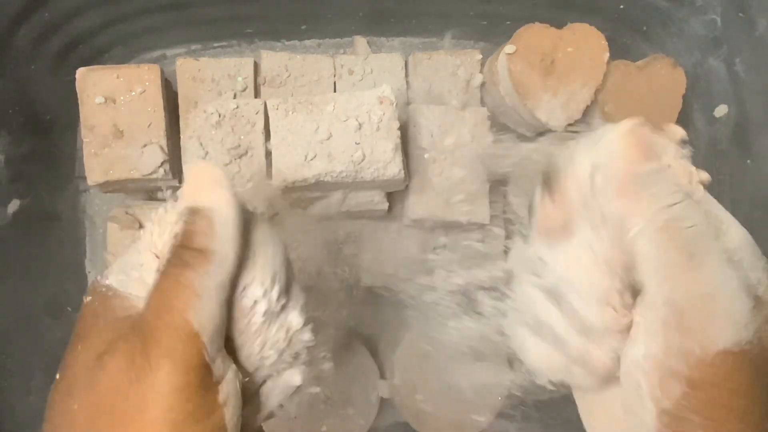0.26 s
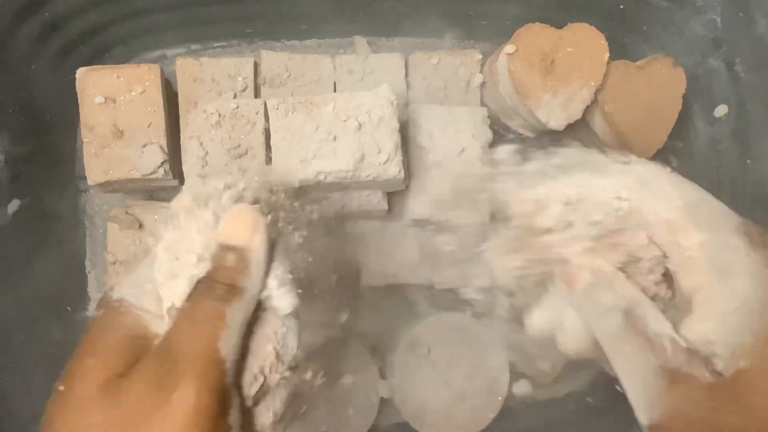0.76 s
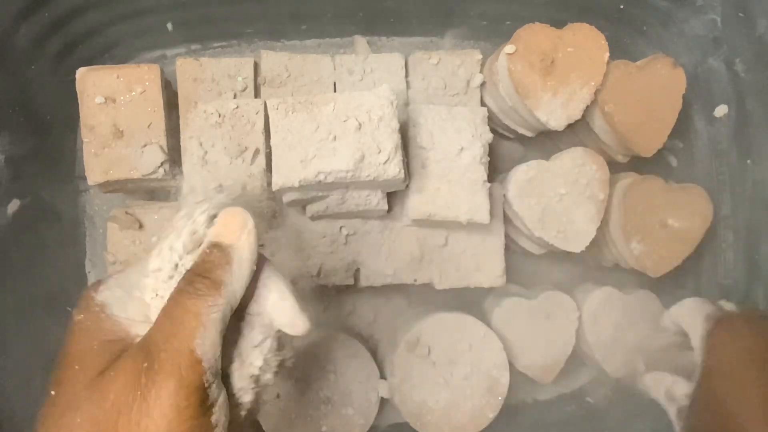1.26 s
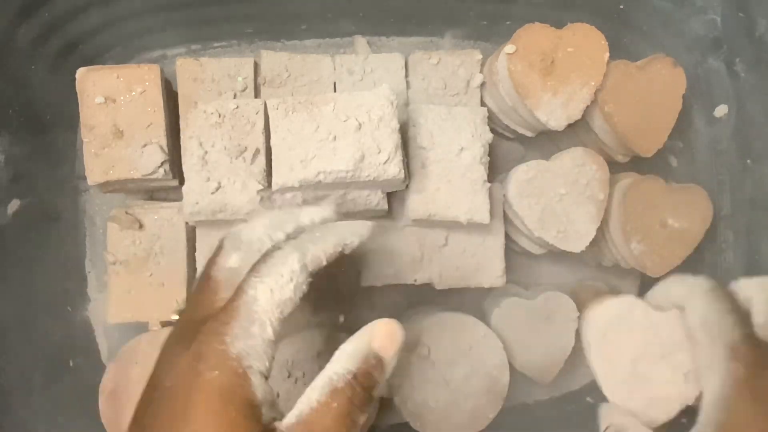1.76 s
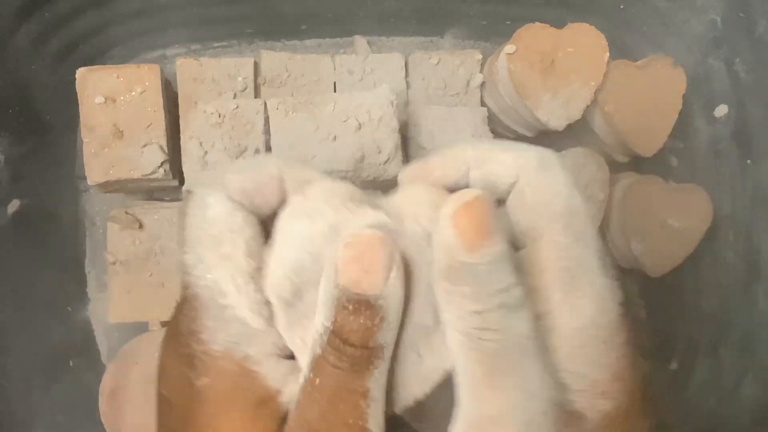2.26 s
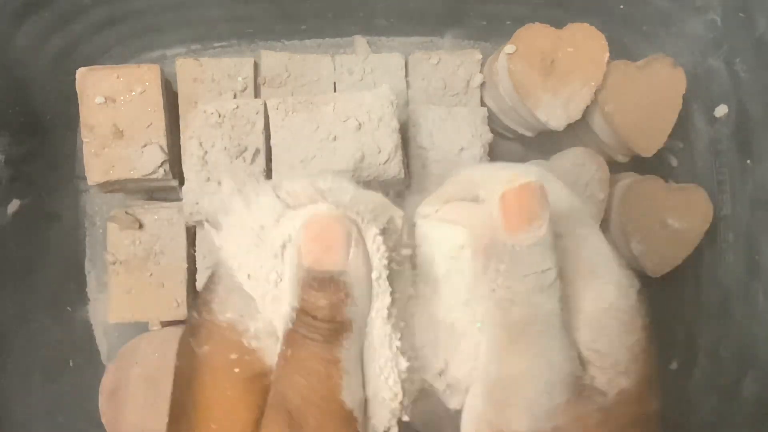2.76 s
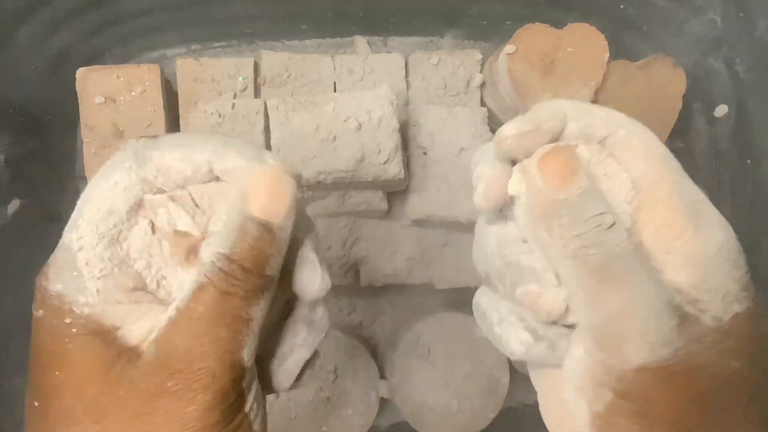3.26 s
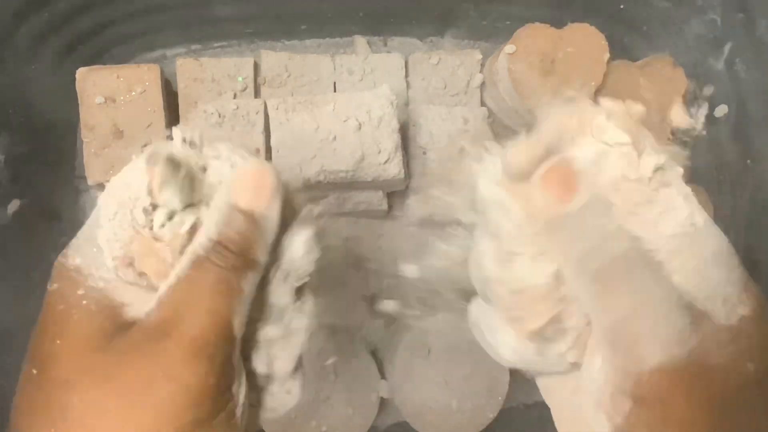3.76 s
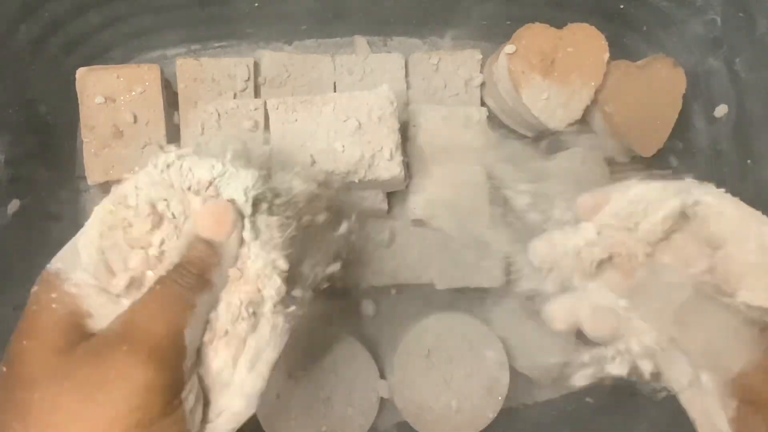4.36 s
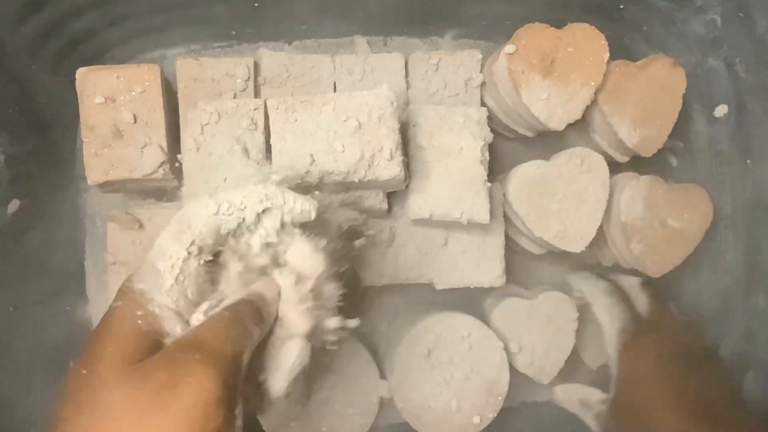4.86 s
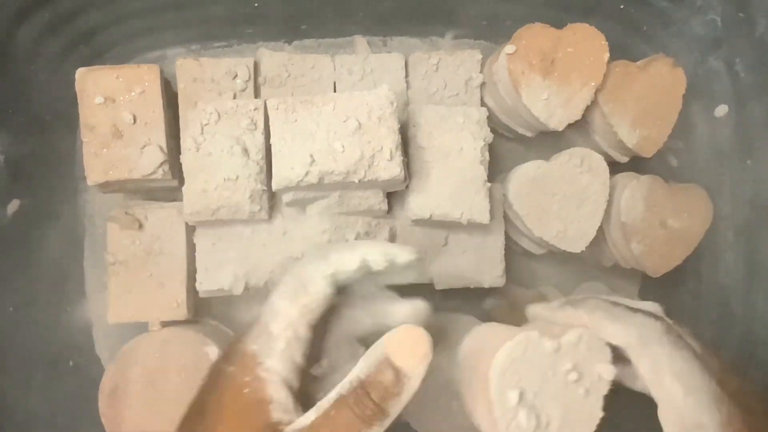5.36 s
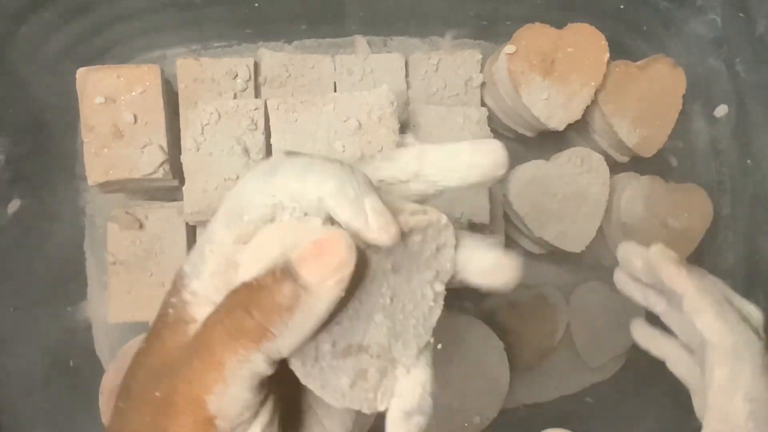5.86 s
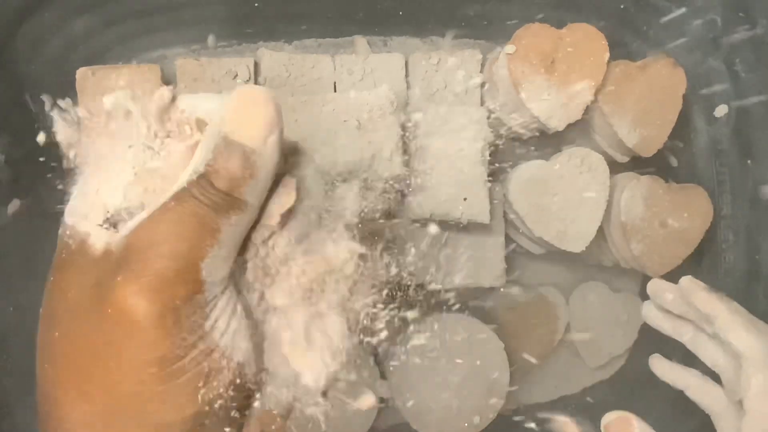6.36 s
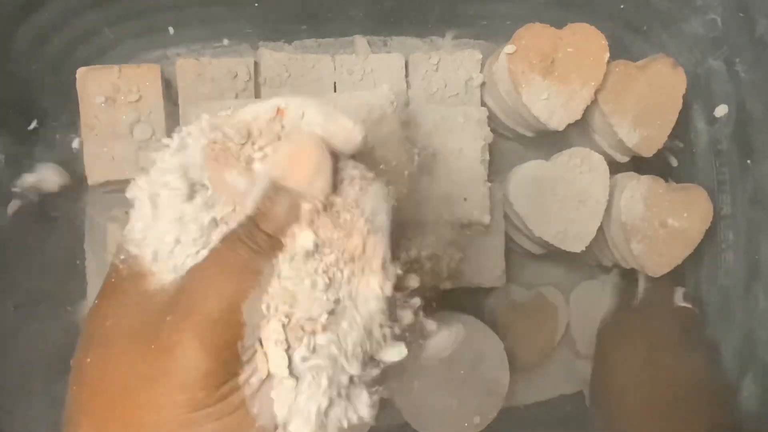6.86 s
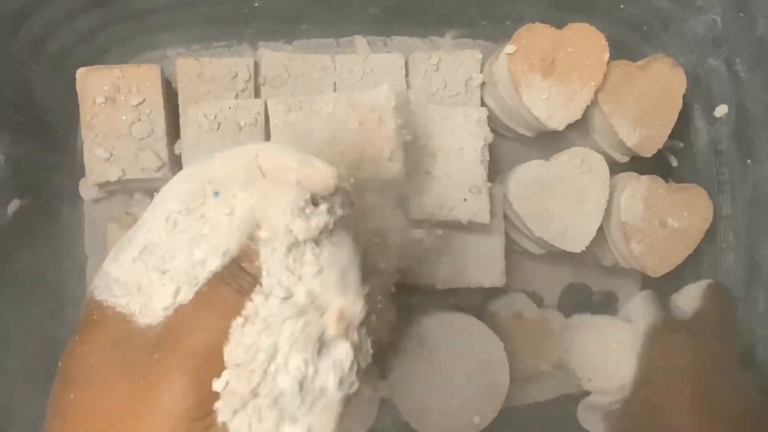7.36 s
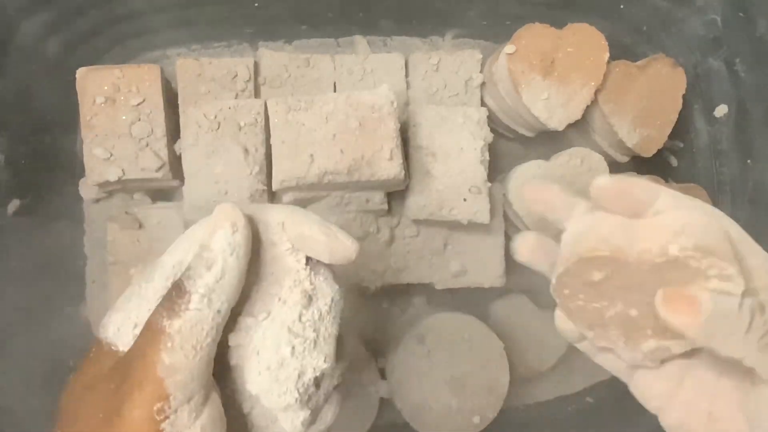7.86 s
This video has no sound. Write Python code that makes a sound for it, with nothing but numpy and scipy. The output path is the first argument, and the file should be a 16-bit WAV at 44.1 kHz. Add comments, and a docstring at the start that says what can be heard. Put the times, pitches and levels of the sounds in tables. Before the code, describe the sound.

Close bursts of chalk being crushed by hand, snapping and crumbling as powder sifts and lumps drop into a tub.

```python
"""Blocks of dry chalk crushed in two hands over a plastic tub, close to a stereo pair of microphones.
Blocks crack, snap and tick, pieces cave in inside the fist, and powder squeaks and hisses
between the fingers. Crumbs patter down, loose powder pours, and larger lumps thud onto the blocks
below and ring the tub. The place is a small, quiet room with a short echo."""
import sys
import numpy as np
from scipy import signal
from scipy.fft import rfft, irfft, next_fast_len
from scipy.io import wavfile
from scipy.ndimage import uniform_filter1d, map_coordinates

SR = 44100
rng = np.random.default_rng(int(sys.argv[2]) if len(sys.argv) > 2 else 0)


def unload_wav(signal):
    """Save mono or channel-first audio to the path in sys.argv[1] as 16-bit WAV at rate SR, clipped to [-1, 1]."""
    wavfile.write(
        sys.argv[1],
        SR,
        np.round(np.clip(np.atleast_2d(signal).T, -1, 1) * 32767).astype(np.int16),
    )


N = 358091

# modes of the loaded tub: (frequency [Hz], width [Hz], gain [dB])
TUB_MODES = [(93.2, 23, 6), (166, 21.4, 7), (202.6, 8.4, 4), (325, 20.6, 2), (405, 8.3, -16),
             (686.6, 18, -2)]
# spectrum of shearing powder: (frequency [Hz], gain [dB])
POWDER_SPECTRUM = [(1500, -10.5), (2900, 3), (4700, 2.5), (6200, 3.5), (7400, 7.5), (9300, 1), (12500, 5),
                   (15500, 2), (16300, -41)]
# spectrum of the bright tick of hard chalk: (frequency [Hz], gain [dB])
TICK_SPECTRUM = [(1500, -35), (4000, -0.5), (7000, 2.5), (16000, -5)]
# fingers slide over a whole block: (start [s], length [s], level [dB], lowest free mode [Hz])
FINGER_STROKES = [(2.011, 0.044, -38.5, 2410), (2.131, 0.1, -47.5, 2340), (2.253, 0.06, -40, 2400),
                  (2.82, 0.03, -38.5, 4600), (2.859, 0.135, -37.5, 5940), (2.993, 0.038, -34.5, 6300),
                  (3.115, 0.05, -39, 6600), (5.342, 0.083, -54, 3450), (5.509, 0.041, -41, 2880),
                  (5.715, 0.073, -44.5, 2380), (5.815, 0.22, -53, 2900), (7.771, 0.3, -46.5, 2940),
                  (8.02, 0.081, -38.5, 7360)]


def amp(db):
    """Decibels to gain."""
    return 10 ** (np.asarray(db) / 20)


def unit(x):
    """x at rms 1."""
    return x / np.sqrt(np.mean(x ** 2) + 1e-20)


def levelled(x, db, span_s):
    """x scaled so that its first span_s seconds have the given rms level."""
    return x * amp(db) / np.sqrt(np.mean(x[:int(span_s * SR)] ** 2))


def add(track, start_s, sound):
    """Mix a sound into the track."""
    part = track[max(round(start_s * SR), 0):][:len(sound)]
    part += sound[:len(part)]


def along(points, hz):
    """(Hz, value) points read on a log axis."""
    knots, values = np.transpose(points)
    return np.interp(np.log(hz + 1), np.log(knots), values)


def hump(hz, centre_hz, octaves):
    """A bell on the log-frequency axis."""
    return np.exp(-.5 * (np.log2((hz + 1) / centre_hz) / octaves) ** 2)


def filtered(x, response):
    """x times a complex response of frequency."""
    n = x.shape[-1]
    size = next_fast_len(n + SR // 2, real=True)
    return irfft(rfft(x, size) * response(np.fft.rfftfreq(size, 1 / SR)), size)[..., :n]


def coloured(x, colour, size=8192):
    """x through a minimum-phase filter whose gain in dB is colour(Hz)."""
    cepstrum = irfft(np.log(amp(colour(np.fft.rfftfreq(size, 1 / SR)))))
    cepstrum[1:size // 2] *= 2
    cepstrum[size // 2 + 1:] = 0
    return signal.oaconvolve(x, irfft(np.exp(rfft(cepstrum))))[:len(x)]


def modes(x, table):
    """The ring of a body with these resonances when x drives it."""
    return filtered(x, lambda hz: sum(
        amp(db) * 1j * hz * width / (centre ** 2 - hz ** 2 + 1j * hz * width)
        for centre, width, db in table))


def wobble(rate):
    """A smooth random curve, rate knots a second."""
    knots = rng.standard_normal(int(N * rate / SR) + 4)
    return map_coordinates(knots, [np.arange(N) * rate / SR])


def grains(rate, spread_db):
    """Random tiny impulses of widely differing size, rate a second."""
    present = rng.random(N) < rate / SR
    size_db = spread_db * np.clip(rng.standard_normal(N), -2, 2)
    return unit(present * np.sign(rng.standard_normal(N)) * amp(size_db))


def surges(rate, t60, spread_db):
    """Envelope of small collapses, rate a second: each starts at once and dies away."""
    fade = amp(-60 * np.arange(SR // 8) / SR / t60)
    power = signal.fftconvolve(grains(rate, spread_db) ** 2, fade ** 2)[:N]
    return unit(np.sqrt(np.abs(power)))


def burst(t, t60, tail_db, tail_t60):
    """A sudden spray of micro-fractures with a weaker, longer trickle."""
    return rng.standard_normal(len(t)) * (amp(-60 * t / t60) + amp(tail_db - 60 * t / tail_t60))


def patchy(x, depth_db):
    """Shifting gaps between the fingers favour now one band, now another."""
    bands = signal.stft(x, nperseg=256)[2]
    gaps = uniform_filter1d(rng.standard_normal(bands.shape), size=4, axis=0)
    gaps = uniform_filter1d(gaps, size=6, axis=1)
    return unit(signal.istft(bands * amp(depth_db * unit(gaps)), nperseg=256)[1][:N])


def lingering(power, t60):
    """Loose grains spread a burst of activity over time: it trickles out."""
    arrivals = amp(-60 * np.arange(SR) / SR / t60) ** 2
    return np.abs(signal.fftconvolve(power, arrivals / arrivals.sum())[:N])


def held(length, attack_s, release_t60, sag_db_per_s=3):
    """Envelope of a hand movement: it builds up, eases as the chalk gives and dies away."""
    t = np.arange(int((length + release_t60) * SR)) / SR
    release_db = -60 * np.maximum(t - length, 0) / release_t60
    return np.minimum(t / attack_s, 1) * amp(release_db - sag_db_per_s * t)


def stroke(length):
    """Envelope of a finger stroke: an arch, and the grains that keep rolling after it."""
    arch = np.abs(np.sin(np.linspace(0, np.pi, int(length * SR)))) ** 0.76
    return np.sqrt(lingering(arch ** 2, t60=0.32))[:SR // 2]


def room_tone():
    """The faint, low hush of the room."""
    # spectrum of the hush: (frequency [Hz], gain [dB])
    spectrum = [(30, 11.5), (90, 33), (1500, 9.5), (5000, -13)]
    return amp(-59) * unit(coloured(rng.standard_normal(N), lambda hz: along(spectrum, hz)))


def room_echo(x):
    """The near walls return a diffuse tail to each microphone; the treble dies first."""
    # decay of the room: (frequency [Hz], t60 [s])
    decay = [(150, 0.16), (10000, 0.08)]
    hz, t, bands = signal.stft(rng.standard_normal((2, SR // 2)), SR, nperseg=256)
    tail = signal.istft(bands * amp(-60 * t / along(decay, hz)[:, None]), SR, nperseg=256)[1]
    return signal.fftconvolve(x[None], tail / np.linalg.norm(tail[0]), axes=1)[:, :N]


def microphones(x):
    """The close pair differs in phase and level through the middle range and agrees at both ends."""
    # phase across the pair: (frequency [Hz], left lead [rad])
    lead = [(0, 0), (430, -1.0), (860, -3.1), (1380, -3.4), (2330, -4.4), (3100, -8.2), (3960, -10.6),
            (4900, -12.6)]
    # balance of the pair: (frequency [Hz], left minus right [dB])
    balance = [(100, -1), (330, -3.5), (620, -7), (1100, 2), (1900, -4), (2900, -12), (5400, -3.5),
               (7200, -8), (12500, 0)]

    def response(hz):
        turn = np.exp(.5j * np.interp(hz, *np.transpose(lead)))
        ratio = amp(along(balance, hz))
        return np.array([ratio * turn, 1 / turn]) * np.sqrt(2 / (1 + ratio ** 2))
    return filtered(x, response)


def pours():
    """Loose powder drops from an opening hand as a soft mass and sets the tub's low modes rumbling."""
    # a hand opens: (start [s], length [s], level [dB])
    openings = [(1.318, 0.31, -44), (4.995, 0.25, -48.5), (6.868, 0.1, -41), (7.173, 0.64, -47.5)]
    # spectrum of powder landing softly: (frequency [Hz], gain [dB])
    spectrum = [(40, -37), (85, -5.5), (300, -12), (900, -46)]
    flow = np.zeros(N)
    for start, length, db in openings:
        add(flow, start, (amp(db) * held(length, attack_s=0.013, release_t60=0.64)) ** 2)
    landings = coloured(grains(rate=590, spread_db=-3.5), lambda hz: along(spectrum, hz))
    return np.sqrt(flow) * unit(landings + 0.5 * modes(landings, TUB_MODES))


def thuds():
    """A lump strikes with a short knock that sags in pitch as it crushes; the tub rings with it."""
    # lumps give way or land: (time [s], level before trim [dB], nominal pitch [Hz])
    lumps = [(0.047, -45.5, 232), (0.623, -36.5, 260), (0.857, -32.5, 422), (1.036, -39.5, 482),
             (1.848, -50, 245), (2.68, -31.5, 280), (3.27, -49, 217), (3.324, -42.5, 240),
             (3.69, -24.5, 481), (4.239, -26, 287), (4.252, -26, 350), (4.295, -16, 585),
             (5.787, -42.5, 627), (6.543, -39.5, 221), (6.65, -35, 510), (6.736, -28, 288),
             (6.857, -17, 449), (6.882, -26.5, 208), (6.886, -25, 112), (6.929, -22.5, 555),
             (6.952, -29, 407), (7.099, -27.5, 215), (7.208, -36, 370), (7.344, -29.5, 390),
             (7.372, -28, 310)]
    knock_t60, attack_s, trim_db = 0.04, 0.0012, -1.5
    out, t = np.zeros(N), np.arange(SR // 4) / SR
    sag = 0.736 + 0.678 * np.exp(-t / 0.0071)
    envelope = amp(-60 * t / knock_t60) * (1 - np.exp(-t / attack_s))
    for start, db, pitch_hz in lumps:
        knock = np.sin(2 * np.pi * np.cumsum(pitch_hz * sag) / SR) * envelope
        spray = burst(t, t60=0.02, tail_db=-11, tail_t60=0.19)
        debris = coloured(spray, lambda hz: 60 * (hump(hz, pitch_hz, 2.69) - 1))
        add(out, start, levelled(unit(knock) + 1.3 * unit(debris), db + trim_db, span_s=0.019))
    low_cut = signal.butter(4, 70, "high", fs=SR, output="sos")  # deep bass is cut below 70 Hz
    return signal.sosfilt(low_cut, out + 2.71 * modes(out, TUB_MODES))


def handwork():
    """Envelopes of how strongly the hands shear powder, break off coarse bits and drop crumbs."""
    # a fist closes on broken chalk: (start [s], length [s], fine powder [dB], coarse bits [dB])
    squeezes = [(0.0, 0.45, -44, -48.5), (0.487, 0.28, -45, -49.5), (0.8, 0.33, -40.5, -48.5),
                (1.144, 0.4, -45.5, -49.5), (1.255, 0.046, -42, -43.5), (1.651, 0.2, -49.5, -55),
                (2.675, 0.023, -46, -53.5), (3.257, 0.07, -42.5, -51.5), (3.412, 0.2, -44, -52.5),
                (3.702, 0.1, -40, -45.5), (3.877, 0.76, -42, -44), (4.563, 0.068, -36.5, -50),
                (4.702, 0.11, -37, -44), (4.935, 0.27, -48.5, -48.5), (6.058, 0.07, -43.5, -49),
                (6.22, 0.037, -36.5, -42.5), (6.447, 0.38, -43, -43.5), (6.862, 0.36, -41, -41),
                (7.259, 0.48, -41.5, -46)]
    shear, rub, bits = np.zeros((3, N))  # powers
    for start, length, powder_db, bits_db in squeezes:
        grip = held(length, attack_s=0.0031, release_t60=0.48)
        add(shear, start, (amp(powder_db) * grip) ** 2)
        add(bits, start, (amp(bits_db) * grip) ** 2)
    for start, length, db, _ in FINGER_STROKES:
        add(rub, start, (amp(db) * stroke(length)) ** 2)
    dust = amp(-78) ** 2  # keeps sifting off the hands
    scraped = rub * amp(-24.5) ** 2
    dropped = bits * amp(2) ** 2 + rub * amp(-15) ** 2
    fall = lingering(dropped + dust, t60=0.34)
    return np.sqrt([shear + dust, bits + scraped + dust, fall])


def crumbs(crackle, bits, fall):
    """Coarser bits break off in short, crisp clumps and patter lightly into the tub."""
    # spectrum of bits breaking off: (frequency [Hz], gain [dB])
    break_spectrum = [(300, -20), (700, -2.5), (1200, -4), (2050, -3), (6000, -14), (12000, -51)]
    # spectrum of crumbs landing: (frequency [Hz], gain [dB])
    landing_spectrum = [(40, -56.5), (90, -10), (230, 4.5), (700, -2.5), (3000, -32)]
    clumps = surges(rate=30, t60=0.018, spread_db=4.5)
    breaks = grains(rate=6500, spread_db=3) * np.hypot(1, 0.7 * crackle + 1.7 * clumps)
    crumble = patchy(coloured(breaks, lambda hz: along(break_spectrum, hz)), depth_db=2)
    landings = coloured(grains(rate=260, spread_db=3), lambda hz: along(landing_spectrum, hz))
    patter = unit(landings + 0.79 * modes(landings, TUB_MODES))
    return crumble * bits + patter * fall


def rubs():
    """A block rings hollow under fingers that catch and slip; its modes wander as the grip shifts."""
    # modes of a rubbed block: (ratio to the lowest mode, gain [dB])
    block_modes = [(1, 3), (1.84, -2)]
    width_hz, drift, skin_db = 190, 0.022, -23
    out, n = np.zeros(N), SR // 2
    for start, length, db, pitch_hz in FINGER_STROKES:
        grit = coloured(rng.standard_normal(n),
                        lambda hz: along(POWDER_SPECTRUM, hz) - 9 * hump(hz, 2040, 0.68))
        ring = modes(grit, [(pitch_hz * ratio, width_hz, gain) for ratio, gain in block_modes])
        ring = map_coordinates(ring, [np.cumsum(1 + drift * wobble(20)[:n])])
        skin_drag = unit(coloured(rng.standard_normal(n), lambda hz: 40 * hump(hz, 1100, 1.5)))
        add(out, start, amp(db) * stroke(length) * (unit(grit + 2 * ring) + amp(skin_db) * skin_drag))
    return out * amp(2 * wobble(60))


def pitched_ticks():
    """Light cracks and clinks: a gritty tick and a short ring that the soft chalk soon damps."""
    # small pitched ticks of chalk: (time [s], level [dB], pitch [Hz])
    ticks = [(0.38, -39, 8100), (0.532, -38.5, 7400), (0.805, -43, 4800), (0.945, -37, 4350),
             (1.7916, -42, 3400), (2.387, -37, 3360), (2.418, -45, 3150), (4.511, -37, 4340),
             (4.798, -32, 4410), (6.1536, -41.5, 4060), (6.192, -39, 7550), (7.061, -49, 5200)]
    # modes of a piece: (ratio to its pitch, mean level [dB])
    piece_modes = [(1, 0), (1.85, -12)]
    ring_t60, scatter_db = 0.028, 3.9
    out, t = np.zeros(N), np.arange(SR // 6) / SR
    for start, db, pitch_hz in ticks:
        ring = sum(amp(level + rng.normal(0, scatter_db)) * np.sin(2 * np.pi * pitch_hz * ratio * t)
                   for ratio, level in piece_modes)
        grit = burst(t, t60=0.012, tail_db=-20, tail_t60=0.08)
        tick = coloured(grit, lambda hz: along(TICK_SPECTRUM, hz))
        add(out, start, levelled(ring * amp(-60 * t / ring_t60) + tick, db, span_s=0.0072))
    return out


def powder(crackle, squeeze):
    """Countless fine grains shear past each other, flaring with each small collapse."""
    shear = grains(rate=22000, spread_db=3.5) * amp(1.4 * wobble(60)) * np.hypot(1, 0.67 * crackle)
    return squeeze * patchy(coloured(shear, lambda hz: along(POWDER_SPECTRUM, hz)), depth_db=3.0)


def crunches():
    """The fist muffles a collapse to a hollow pop, and a run of smaller pops grinds on after it."""
    # a piece caves in deep inside the fist: (time [s], first pop [dB], t60 of the grit [s])
    collapses = [(0.2564, -35.5, 0.046), (0.863, -25, 0.14), (1.264, -27.5, 0.17), (1.283, -23, 0.36),
                 (4.773, -28.5, 0.78), (4.8298, -25.5, 0.0534), (5.172, -39, 0.047), (6.6495, -23, 0.13),
                 (6.868, -26, 0.4), (7.7077, -34.5, 0.05)]
    hollow_hz, slips_per_s, grit_db = 1775, 650, -12.5
    out, t = np.zeros(N), np.arange(SR // 4) / SR
    hollow = lambda hz: 34 * (hump(hz, hollow_hz, 0.83) - 1)
    for start, db, t60 in collapses:
        pop = coloured(signal.unit_impulse(len(t)), hollow)
        slips = (rng.random(len(t)) < slips_per_s / SR) * rng.standard_normal(len(t))
        grit = unit(coloured(slips, hollow)) * amp(db + grit_db - 60 * t / t60)
        add(out, start, levelled(pop, db, span_s=0.0039) + grit)
    return out


def cracks():
    """A fracture runs through in a few ms, coloured by the piece it frees and by the cupped hand."""
    # blocks break: (time [s], low snap [dB], bright tick [dB], ring of the piece [Hz])
    fractures = [(0.0606, -60, -34.5, 5400), (0.0897, -60, -32.5, 5100), (0.131, -70, -31.5, 5450),
                 (0.309, -32.5, -33.5, 3300), (0.396, -42.5, -32.5, 7700), (0.6213, -40.5, -34, 5040),
                 (0.8545, -29, -29.5, 2290), (0.9166, -36, -33.5, 6500), (1.0398, -30.5, -34, 2300),
                 (1.1845, -42, -34.5, 6200), (1.2153, -45, -33.5, 4750), (2.6788, -38, -35, 2170),
                 (3.325, -39, -38, 7400), (3.7175, -22, -26, 5920), (4.004, -51, -35, 4960),
                 (4.1042, -55.5, -20.5, 7500), (4.127, -22.5, -25.5, 2630), (4.3714, -46, -32.5, 10300),
                 (4.566, -65, -30.5, 7540), (4.599, -54.5, -31, 7040), (6.0653, -48, -34.5, 6500),
                 (6.474, -35.5, -29.5, 4320), (6.5945, -70, -31.5, 7450), (6.8592, -27.5, -35, 1080),
                 (6.9305, -25, -34.5, 1900), (7.0972, -29, -29.5, 3280), (7.172, -30, -27, 5040),
                 (7.828, -37.5, -39, 3060)]
    # spectrum of the low snap: (frequency [Hz], gain [dB])
    snap_spectrum = [(60, -11), (200, -6.5), (900, 7), (2200, 0), (4000, -1), (9000, -64.5)]
    out, t = np.zeros(N), np.arange(SR // 8) / SR
    for start, snap_db, tick_db, ring_hz in fractures:
        spacing_hz = 850 * np.exp(rng.normal(0, 0.15))  # between the resonances of the hand
        hand_db = lambda hz: 3 * np.cos(2 * np.pi * (hz - ring_hz) / spacing_hz) * hump(hz, ring_hz, 1)
        ring_db = lambda hz: 7 * hump(hz, ring_hz, 0.25) + hand_db(hz)
        snap = coloured(burst(t, t60=0.011, tail_db=-23, tail_t60=0.13),
                        lambda hz: along(snap_spectrum, hz) + ring_db(hz))
        tick = coloured(burst(t, t60=0.011, tail_db=-27, tail_t60=0.31),
                        lambda hz: along(TICK_SPECTRUM, hz) + ring_db(hz))
        add(out, start, levelled(snap, snap_db, span_s=0.012) + levelled(tick, tick_db, span_s=0.007))
    return out


def scene():
    """Chalk close to the microphones, over the faint hush and echo of the room."""
    squeeze, bits, fall = handwork()
    crackle = surges(rate=90, t60=0.015, spread_db=4.5)  # powder and crumbs flare together
    fine = powder(crackle, squeeze) + rubs() + pitched_ticks()
    coarse = crumbs(crackle, bits, fall) + cracks() + crunches()
    lumps = thuds() + pours()
    direct = microphones(fine + coarse + lumps + room_tone())
    return direct + room_echo(amp(-25) * fine + amp(-9.5) * coarse + amp(-19) * lumps)


def record(dry):
    """Peaks clip at full scale, then everything above 16.3 kHz is cut."""
    return filtered(np.clip(dry, -1, 1), lambda hz: hz < 16300)


dry = scene()
out = record(dry)
unload_wav(out)
```